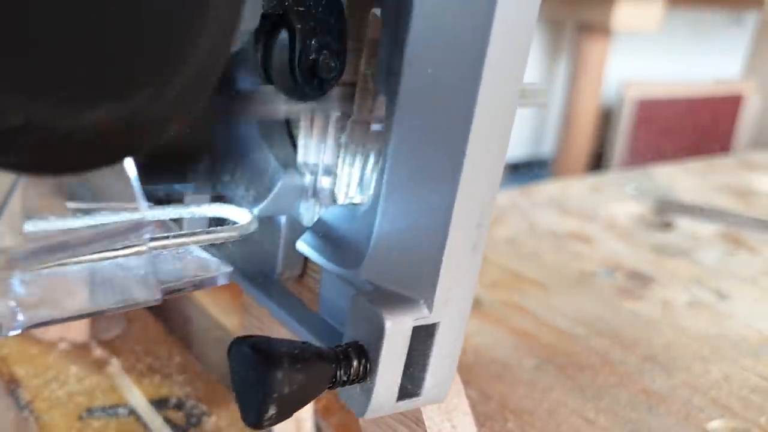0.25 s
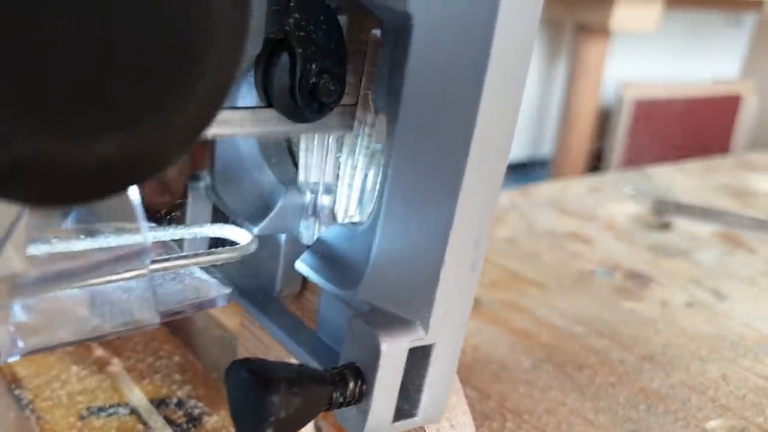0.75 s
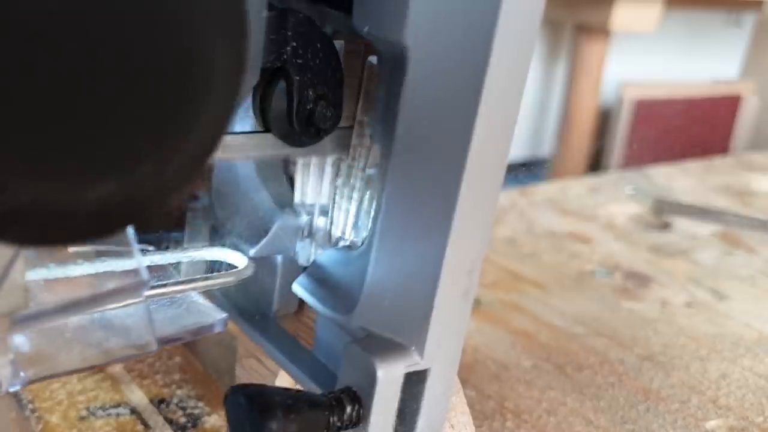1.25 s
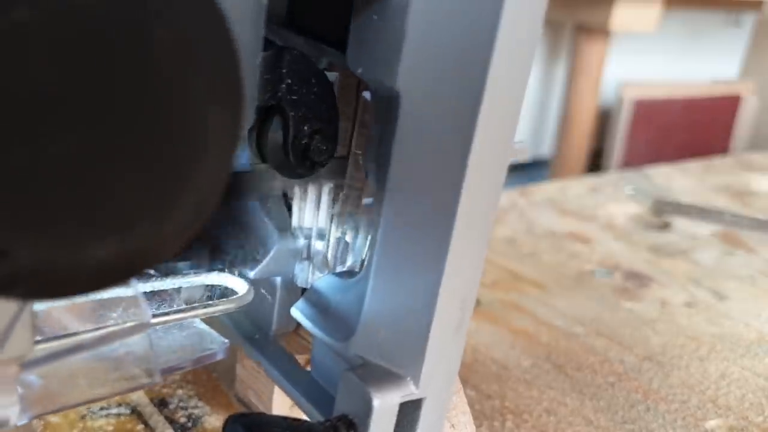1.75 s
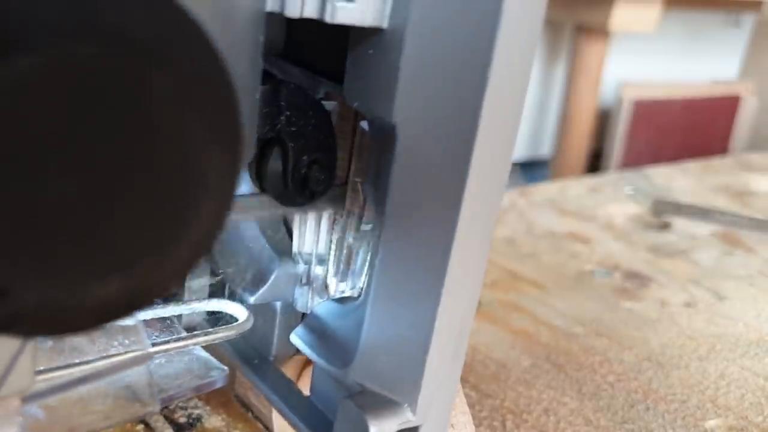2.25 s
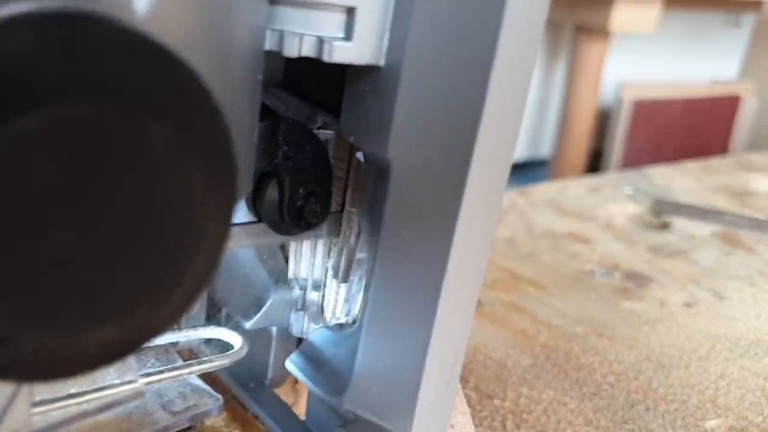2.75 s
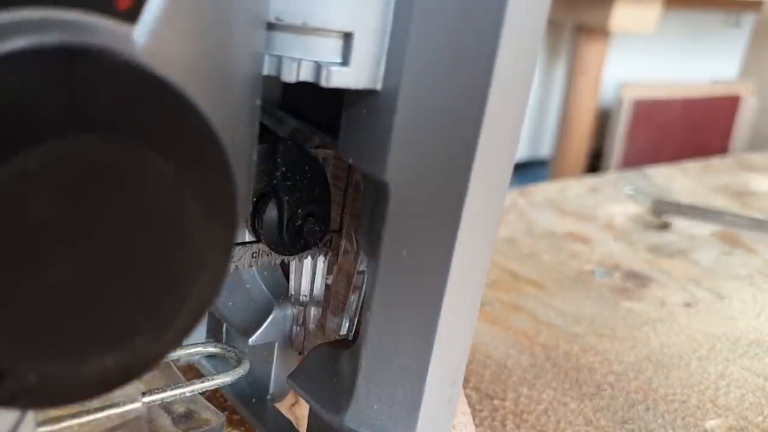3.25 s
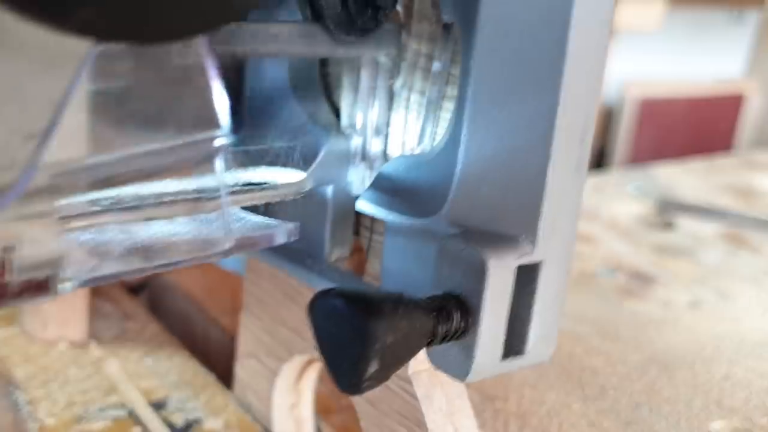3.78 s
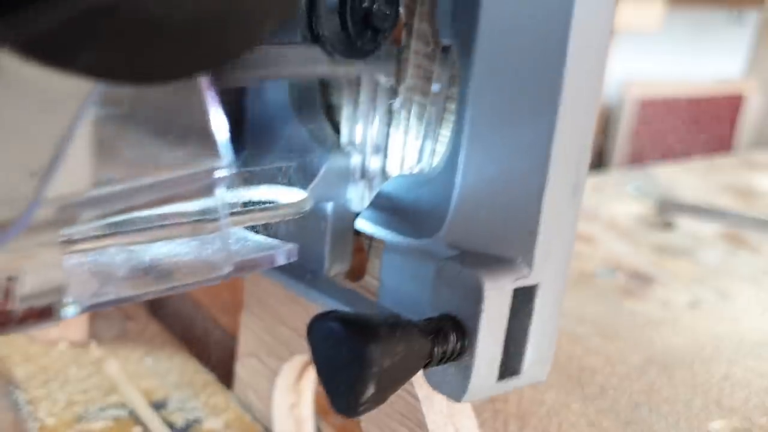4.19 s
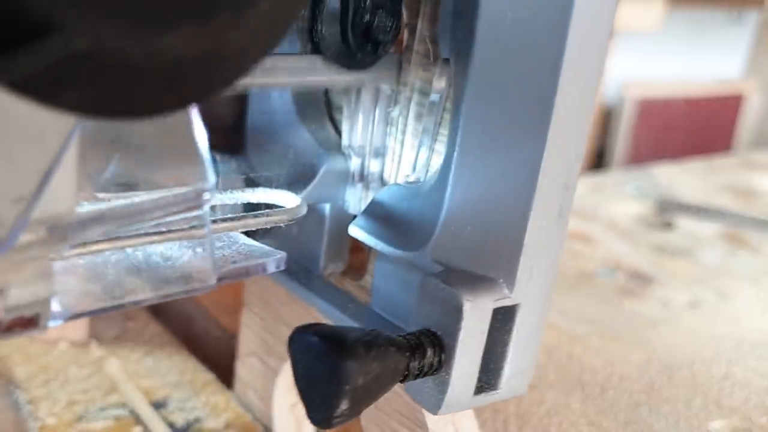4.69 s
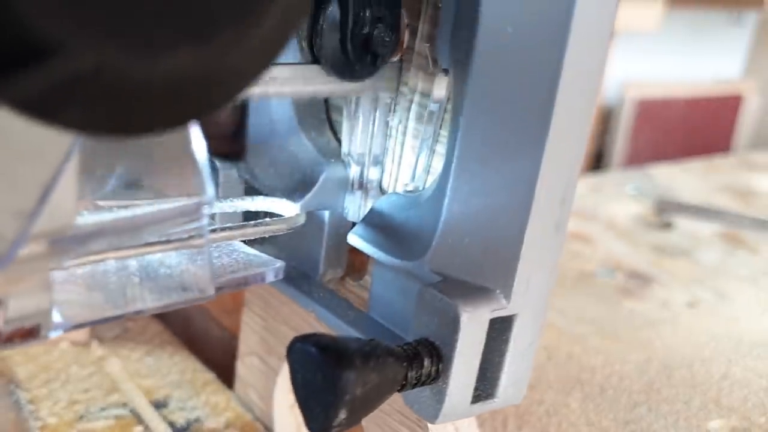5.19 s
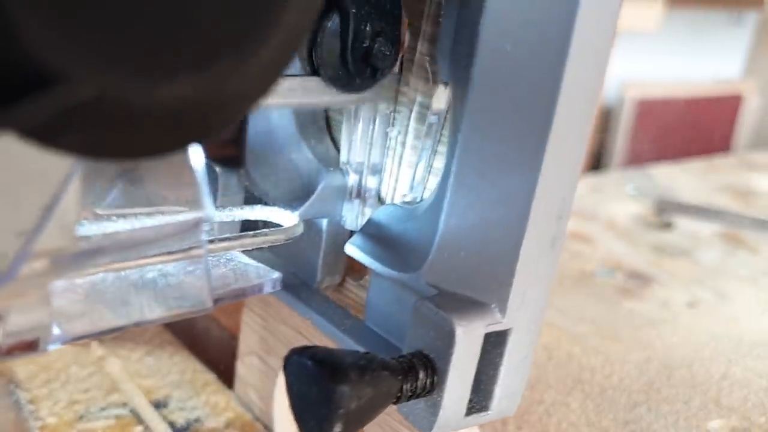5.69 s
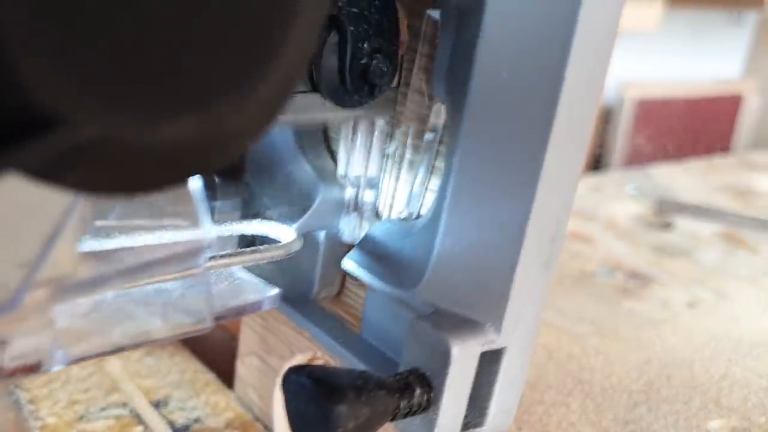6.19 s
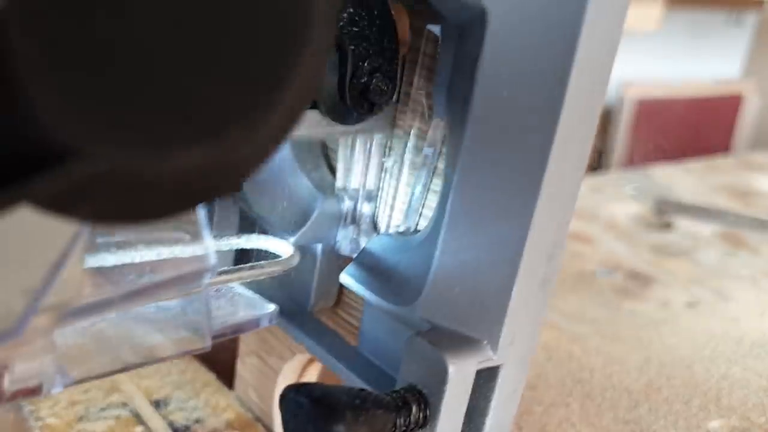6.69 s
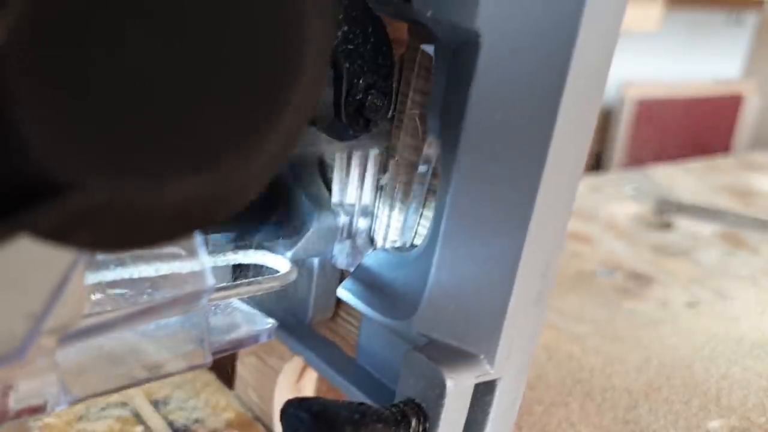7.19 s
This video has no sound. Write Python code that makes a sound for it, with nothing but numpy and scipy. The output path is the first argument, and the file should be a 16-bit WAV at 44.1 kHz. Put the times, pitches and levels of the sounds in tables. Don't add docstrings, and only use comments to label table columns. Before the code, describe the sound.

A jigsaw runs steadily with a high gear whine and fast, hissing blade rasp, its loose blade clattering in bouts. It winds down abruptly at about three seconds. After half a second of near silence it snaps back much louder, drops to a slow coarse buzz, then steps up twice to full speed with thin squeals and a few hard ticks. Close phone microphone, small dry workshop.

```python
import sys
import numpy as np
from scipy import signal
from scipy.io import wavfile
from scipy.ndimage import uniform_filter1d

SR = 44100
rng = np.random.default_rng(int(sys.argv[2]) if len(sys.argv) > 2 else 0)


def transcribe(u):
    v = np.clip(np.atleast_2d(u).T, -1, 1)
    q = np.round(v * 32767).astype(np.int16)
    wavfile.write(sys.argv[1], SR, q)


def level_to_linear(level):
    exponent = np.asarray(level, float) / 20
    return 10 ** exponent


N = 328104

# (start [s], end [s])
RUN_TIMES = [(-.01, 3.23), (3.779, 7.5)]
# (time [s], tooth rate [Hz])
TRIGGER = [
    [(0, 1950), (.24, 1980), (.7, 1989), (1.3, 1972), (2.8, 1981), (3.08, 2010), (3.2, 1250)],
    [(3.775, 1938), (3.92, 1925), (4.365, 1941), (4.5, 1015), (4.71, 1015), (4.775, 1372), (5.12, 1411),
     (5.42, 1396), (5.86, 1430), (5.92, 1940), (6.32, 1969)],
]
# (nearness [dB], growl [dB], crank second order [dB],
# crank first order [dB], stroke lead [turns])
GRIP_BY_RUN = [
    (-12, 4, 4.5, -8.5, 0.01),
    (0.17, 2.5, 0.3, 1.3, 0.14),
]
# (tooth rate [Hz], rasp [dB], gear growl [dB over rasp],
# low body [dB over rasp], stroke depth [0-1])
EFFORT_BY_SPEED = [(1000, -42.5, -17, -18.5, 0.54), (1360, -39.5, -15, -18.5, 0.4),
                   (1941, -36, -13.5, -19.5, 0.29), (1950, -35, -15, -20.5, 0.21),
                   (1984, -35, -13.5, -19.5, 0.29)]
# (tooth rate [Hz], tooth order 1 [dB over rasp],
# order 2 [dB over rasp], order 3 [dB over rasp], eighth shaft order [dB over rasp])
WHINE_BY_SPEED = [(1030, -25, -16, -13, -24), (1482, -14, -26, -23, -25), (1922, -21.5, -13, -22, -17),
                  (1960, -16, -24, -25, -18), (1974, -12, -31, -28, -20), (1990, -10, -31, -28, -19)]
# (tooth rate [Hz], crank second order [dB over rasp],
# first order [dB over rasp], change of higher orders [dB])
THROB_BY_SPEED = [(1020, -34, -38, -1.5), (1404, -19, -33.5, -1), (1385, -16, -40, -3),
                  (1920, -25, -29.5, 0), (1965, -27.5, -27, -1.1)]

# (turns of the motor shaft [order], level [dB over eighth order])
SHAFT_ORDERS = [(6, -5.5), (6.38, -13), (6.75, -2.5), (7.25, -1.5), (7.64, -9), (8.5, -8), (13.2, -22.5),
                (28, -2)]
# (pitch [Hz], width [Hz], level [dB])
GEAR_CASE = [(1758, 160, -5), (1965, 260, 4), (2158, 61, -6), (3967, 350, -2), (5880, 470, -10.5)]
# (order, run one [dB over low body], run two [dB over low body])
CRANK_ORDERS = [(3, -20.5, -20), (4, -15.5, -17.5), (5, -26, -18.5), (7, -12.5, -15.5), (8.14, -12, -13.5),
                (10, -16, -17), (13, -17, -13.5), (17, -24, -21.5)]
# (pitch [Hz], level [dB])
RASP_COLOUR = [(900, -52.5), (1200, -15.5), (1500, -14.5), (1800, -11), (2050, -8), (2600, -11),
               (3000, -10.5), (3600, -10.5), (4200, -9), (5400, -10.5), (6500, -7.5), (7900, 0),
               (9500, -10.5), (12000, -20.5), (14300, -25.5)]
# (pitch [Hz], level [dB])
BODY_COLOUR = [(47, -31), (80, -12), (178, -15.5), (273, -6), (394, -15), (451, -6.5), (1500, -7),
               (1950, -38), (3300, -120)]
# (pitch [Hz], width [Hz], level [dB over rasp])
STEEL_GUIDE = [(3035, 40, -30), (7870, 90, -9), (8090, 120, -11), (8230, 90, -14)]
# (pitch [Hz], width [Hz], level [dB])
BLADE_MODES = [(1764, 160, -1.5), (1854, 120, -4), (3880, 620, -20), (5835, 500, -9), (7740, 1200, 7),
               (9470, 660, -7)]
# (pitch [Hz], width [Hz], level [dB])
BUZZ_MODES = [(5750, 420, 1.5), (3800, 500, -8), (9500, 800, -6)]
# (pitch [Hz], width [Hz], level [dB])
ROLLER_MODES = [(3910, 360, 0)]
# (start [s], end [s], level [dB], buzz [dB over level])
CHATTER_BOUTS = [(-.05, 0.193, -45.5, -17), (1.3, 1.37, -45.5, -6), (1.379, 1.54, -40, -4),
                 (1.562, 1.652, -41.5, -5.5), (1.665, 1.77, -44, -11), (1.796, 1.887, -46.5, -1.5),
                 (1.912, 2.13, -44.5, -14.5), (2.145, 2.42, -44.5, -12), (2.444, 2.64, -43.5, -12.5),
                 (2.62, 2.756, -45.5, -9.5)]
# (time [s], peak [dB], roller [dB over peak])
BLADE_SLAPS = [(0.0133, -23.5, -25), (0.0598, -28, -22), (0.091, -20.5, -13), (0.168, -22.5, -16),
               (0.1888, -22, -14), (0.3112, -27.5, -14), (0.4205, -32, -24), (1.306, -29.5, -19),
               (1.3538, -27, -24), (1.3713, -22.5, -27), (1.401, -21, -25), (1.4604, -22.5, -13.5),
               (1.5748, -21, -30), (1.6227, -31.5, -18), (1.7285, -28, -13), (1.8427, -22, -23),
               (1.8696, -28, -24), (1.919, -25, -25), (1.9659, -21.5, -21), (2.033, -34, -29),
               (2.2819, -20, -17), (2.378, -22, -9), (2.5968, -25, -22), (2.6746, -25.5, -22),
               (2.6948, -25, -24), (6.0558, -18, -25), (6.4167, -19, -25), (7.2246, -15, -22),
               (7.3242, -16, -22), (7.3805, -16.5, -18)]
# (start [s], end [s], pitch [Hz], level [dB])
SQUEAL_TIMES = [(.28, 1.3, 4010, -69), (3.789, 3.84, 3930, -52), (3.803, 4.423, 1965, -54),
                (4.78, 4.96, 4150, -60), (5.1, 5.4, 4320, -58), (5.348, 5.87, 3120, -61.5),
                (5.99, 6.7, 3840, -59.5), (6.753, 7.5, 1780, -56.5), (6.82, 7.4, 3705, -56.5),
                (7.05, 7.5, 3980, -61)]
# (pitch [Hz], level [dB])
QUIET_COLOUR = [(20, 4), (50, 7.5), (100, -9), (300, -9.5), (700, -11.5), (1500, -23.5), (4000, -25.5),
                (12000, -37)]
# (start [s], end [s], level [dB over hum])
HAND_SHIFT = (3.64, 3.75, 11)

QUIET_DB, HUM_DB = -99.5, -103
PINION, CRANK_TEETH, STROKE_TEETH = 7, 57, 39.7
LASH_DB = .8
HANDLE_HZ, HANDLE_WIDTH_HZ, HANDLE_DB = 167.3, 14, 6
SLOW_DULL_DB, SLOW_DULL_HZ = -7, 4400
SLOW_BANDS_DB, SLOW_BAND_HZ = 1, 1340
CALM_DB, BOUT_EDGE_S = -52.5, 0.022
RASP_LIFT = 0.069
SLAP_T60_S = 0.018
RUMBLE_DB = -28.5
FADE_S, FADE_DB, FADE_POWER = 3.075, -53, 6.8
BODY_FADE = 0.56
WIND_DOWN_S, WIND_DOWN_DB = 2.8, 3
BENCH_DB, BENCH_T60_S = -8.5, .11
SWAY_PER_S = .8


def evened(x):
    return x / np.sqrt(np.mean(x ** 2) + 1e-20)


def drift(size, hz):
    smooth = uniform_filter1d(rng.standard_normal(size), int(SR / hz / 2))
    return evened(signal.lfilter([1], [1, -np.exp(-2 * np.pi * hz / SR)], smooth))


def coloured(points, size, patchy_db=0.5):
    hz, frames = np.fft.rfftfreq(512, 1 / SR), size // 128 + 5
    f, db = np.transpose(points)
    a, b, patches = rng.standard_normal((frames, 257, 3)).T
    patches = uniform_filter1d(patches, size=6, axis=0)
    patches = evened(uniform_filter1d(patches, size=10, axis=1))
    colour_db = np.interp(np.log(hz + 1), np.log(f), db, -90, -90)[:, None]
    z = (a + 1j * b) * level_to_linear(colour_db + patchy_db * patches)
    return evened(signal.istft(z, nperseg=512, noverlap=384)[1][:size])


def resonate(x, hz, width):
    turn = np.exp(2j * np.pi * np.cumsum(hz * np.ones(len(x))) / SR)
    r = np.exp(-np.pi * width / SR)
    return 2 * (turn * signal.lfilter([(1 - r) ** 2], [1, -2 * r, r * r], x / turn)).real


def ring(x, modes):
    power = sum(level_to_linear(2 * db) for hz, width, db in modes)
    out = 0
    for hz, width, db in modes:
        out = out + level_to_linear(db) * resonate(x, hz, width) * np.sqrt(SR / (np.pi * width * power))
    return out


def tone(turns, db, waver_db, slip, hz=20):
    size = len(turns)
    strength = np.sqrt(2) * level_to_linear(db + waver_db * drift(size, hz))
    return strength * np.sin(2 * np.pi * turns + slip * drift(size, hz) + 6 * rng.random())


def curves(rows, t):
    s, *columns = np.transpose(rows)
    return [np.interp(t, s, c) for c in columns]


def window(t, start, end):
    return np.clip(np.minimum(t - start, end - t) / BOUT_EDGE_S + .5, 0, 1)


def looseness(t, buzz=0):
    bouts = []
    for a, b, db, buzz_db in CHATTER_BOUTS:
        bouts.append(window(t, a, b) * (db + buzz * (buzz_db + 17.5) - CALM_DB))
    return CALM_DB - 20 * buzz + np.max(bouts, axis=0)


def quiet_shop(t):
    start, end, shift_db = HAND_SHIFT
    hum = evened(resonate(rng.standard_normal(N), 45, 35))
    hum *= level_to_linear(HUM_DB + shift_db * window(t, start, end))
    return hum + level_to_linear(QUIET_DB + 1.5 * drift(N, 30)) * coloured(QUIET_COLOUR, N)


def gears(teeth, lash_db, whine_db, second_db, third_db, side_db, growl_db):
    whine = tone(teeth, whine_db, 1.5, .25, 12)
    whine += tone(2 * teeth, second_db - .6, 1.8, .45, 25)
    whine += tone(3 * teeth, third_db - 1.5, 3.0, 1.2, 40)
    whine += tone(8 / PINION * teeth, side_db - 0.5, 2.6, 0.91)
    for k, db in SHAFT_ORDERS:
        whine += tone(k / PINION * teeth, side_db + db, 4.0, .3 + k / 12, 30)
    growl = ring(rng.standard_normal(len(teeth)), GEAR_CASE)
    return whine * level_to_linear(-lash_db) + level_to_linear(growl_db + 1.8 * drift(len(teeth), 70)) * growl


def crank(teeth, second_db, first_db, body_db, run):
    turns = teeth / CRANK_TEETH
    turn_hz = np.gradient(turns) * SR
    throb = tone(turns, first_db, .8, .1) + tone(2 * turns, second_db, .4, .05)
    for row in CRANK_ORDERS:
        off_handle = (row[0] * turn_hz - HANDLE_HZ) / HANDLE_WIDTH_HZ
        handle_db = run * HANDLE_DB * np.exp(-off_handle ** 2)
        throb += tone(row[0] * turns, body_db + row[1 + run] + handle_db, 1.5, 0.3, 6)
    return throb


def blade(turns, rasp_db, body_db, depth, slow):
    size = len(turns)
    force = level_to_linear(2.0 * rng.standard_normal(400))[(turns + .5).astype(int)]
    scrape = np.exp(1.2 * (np.cos(2 * np.pi * turns) - 1)) * force
    depth = np.clip(depth, 0, 1)
    stroke = (1 - depth + 1.11 * depth * scrape) * level_to_linear(0.72 * drift(size, 180))
    guide = 0
    for hz, width, db in STEEL_GUIDE:
        guide = guide + level_to_linear(db) * evened(resonate(rng.standard_normal(size), hz, width))
    rasp = coloured(RASP_COLOUR, size)
    low = signal.oaconvolve(rasp, signal.firwin(255, SLOW_DULL_HZ, fs=SR), "same")
    rasp = rasp - (1 - level_to_linear(SLOW_DULL_DB * slow)) * low
    tooth_hz = np.gradient(turns) * SR * STROKE_TEETH
    bands = sum(resonate(low, k * tooth_hz, SLOW_BAND_HZ) for k in range(2, 5))
    rasp += slow * level_to_linear(SLOW_BANDS_DB) * bands
    return level_to_linear(rasp_db) * stroke * (rasp + guide) + level_to_linear(body_db) * coloured(BODY_COLOUR, size)


def slap_blows():
    blows = np.zeros((2, N))
    t = np.arange(2000) / SR
    rise = np.minimum(t / .0006, 1)
    for s, peak_db, roller_db in BLADE_SLAPS:
        part = blows[:, round(s * SR):][:, :2000]
        blow = level_to_linear(peak_db - 5.0 - 60 * t / SLAP_T60_S) * rise * rng.standard_normal(2000)
        part += (level_to_linear(np.array([[0], [roller_db]])) * blow)[:, :part.shape[1]]
    return blows


def chatter(t):
    level = level_to_linear(looseness(t) + FADE_DB * np.clip(10 * (t - FADE_S), 0, 1))
    clumps = level_to_linear(1.7 * np.clip(drift(N, 45), -3, 2))
    knocks = evened(rng.standard_normal(N) * (rng.random(N) < 2500 / SR) * clumps)
    on_blade, on_roller = slap_blows()
    out = ring(knocks * level, BLADE_MODES)
    out += ring(knocks * level_to_linear(looseness(t, buzz=1)) * (t < FADE_S), BUZZ_MODES)
    out += ring(on_blade, BLADE_MODES[1:])
    out += level_to_linear(-16) * resonate(on_blade, 8200, 4000)
    out += level_to_linear(4.0) * ring(on_roller, ROLLER_MODES)
    rumble = evened(resonate(rng.standard_normal(N), 16, 30))
    return out + level_to_linear(RUMBLE_DB) * level * rumble


def bench(x):
    wet, sway = np.zeros(N), np.pi * SWAY_PER_S * np.arange(N) / SR
    for k in range(3):
        taps = np.zeros(6000)
        places = np.arange(60, 5980, 20) + rng.integers(0, 20, 296)
        taps[places] = rng.choice([-1., 1.], 296)
        taps *= level_to_linear(-60 * np.arange(6000) / SR / BENCH_T60_S)
        share = np.sqrt(8 / 9) * np.cos(sway + k * np.pi / 3) ** 2
        wet += signal.oaconvolve(x * share, taps / np.linalg.norm(taps))[:N]
    return (x + level_to_linear(BENCH_DB) * wet) / np.sqrt(1 + level_to_linear(2 * BENCH_DB))


def squeals(t):
    return sum(window(t, a, b) * tone(hz * t, db, 3.1, 0.97, 15) for a, b, hz, db in SQUEAL_TIMES)


def saw_run(run, t):
    near_db, grip_db, second_db, first_db, lead = GRIP_BY_RUN[run]
    first = 1 - run
    tooth_hz = uniform_filter1d(curves(TRIGGER[run], t)[0], size=600, mode="nearest")
    teeth = np.cumsum(tooth_hz) / SR
    rasp_db, growl_db, body_db, depth = curves(EFFORT_BY_SPEED, tooth_hz)
    fade_db = first * FADE_DB * (np.maximum(t - FADE_S, 0) * 10) ** FADE_POWER
    rasp_db = rasp_db + near_db + fade_db

    speed_change = abs(np.gradient(np.log(tooth_hz))) * SR
    lash_db = LASH_DB * uniform_filter1d(speed_change, size=900)
    whine_db = rasp_db + curves(WHINE_BY_SPEED, tooth_hz)
    machine = gears(teeth, lash_db, *whine_db, rasp_db + growl_db + grip_db)

    throb_db = rasp_db + curves(THROB_BY_SPEED, tooth_hz)
    machine += crank(teeth, throb_db[0] + second_db, throb_db[1] + first_db, throb_db[2] + body_db, run)

    freed_db = first * WIND_DOWN_DB * np.clip((t - WIND_DOWN_S) * 5, 0, 1)
    freed_db = freed_db - (1 - BODY_FADE) * fade_db
    slow = np.clip((1970 - tooth_hz) / 955, 0, 1) ** 4 * run
    lift_db = RASP_LIFT * (looseness(t) - CALM_DB)
    strokes = teeth / STROKE_TEETH + lead + 1
    return machine, blade(strokes, rasp_db + lift_db, rasp_db + body_db + freed_db, depth, slow)


def scene():
    t = np.arange(N) / SR
    machine, rasp, running = np.zeros((3, N))
    for run, (start, end) in enumerate(RUN_TIMES):
        last = N if run else round(end * SR)
        span = slice(round(TRIGGER[run][0][0] * SR), last)
        machine[span], rasp[span] = saw_run(run, t[span])
        running += (t > start) & (t < end)
    saw = machine + bench(rasp + chatter(t)) + squeals(t)
    saw *= uniform_filter1d(running, size=180, mode="nearest")
    return (saw + quiet_shop(t))[None]


def band_limit(x):
    return signal.sosfilt(signal.butter(12, 14650, fs=SR, output="sos"), x)


def record(dry):
    low_pass = signal.firwin(511, 14150, window=("kaiser", 9), fs=SR)
    limited = signal.oaconvolve(dry, low_pass[None], "same")
    return band_limit(limited)


dry = scene()
out = record(dry)
transcribe(out)
```